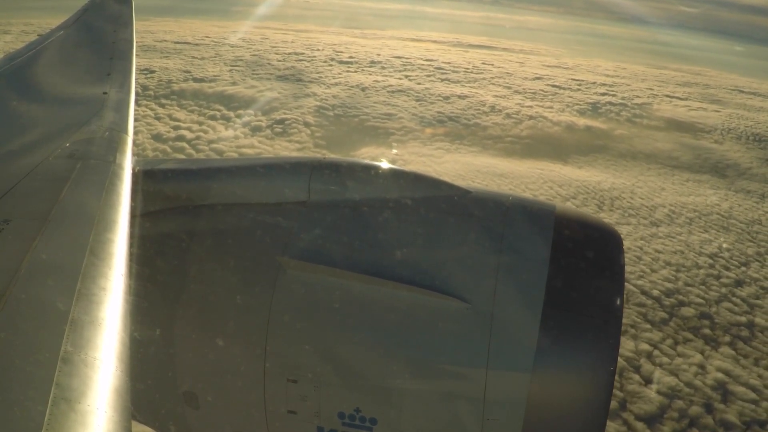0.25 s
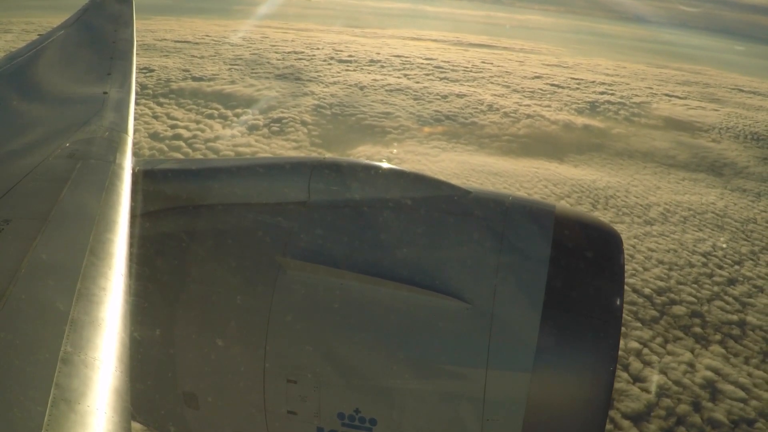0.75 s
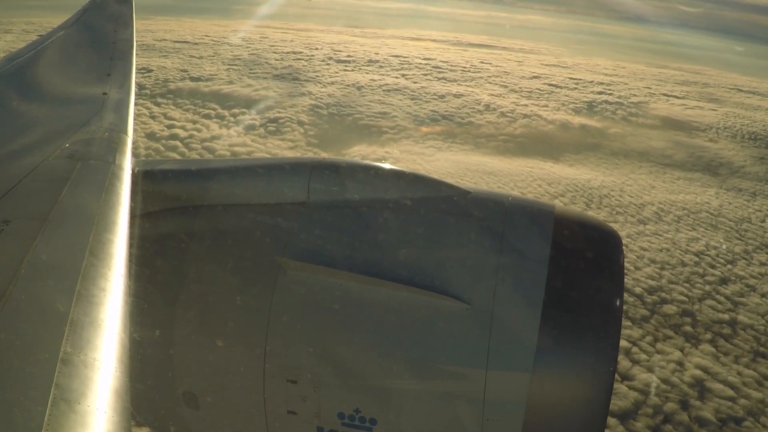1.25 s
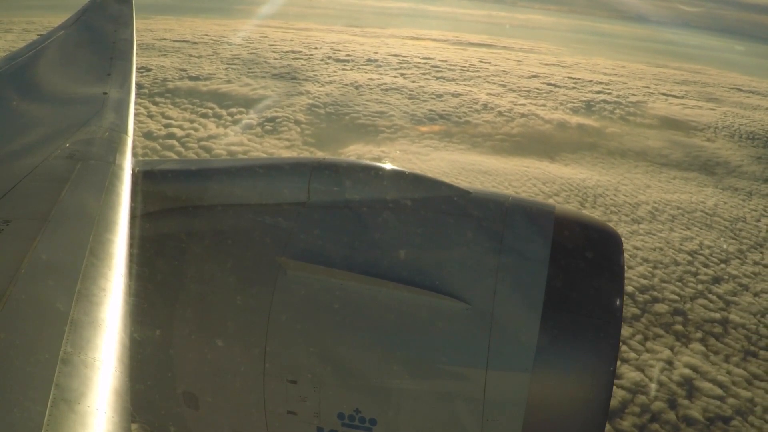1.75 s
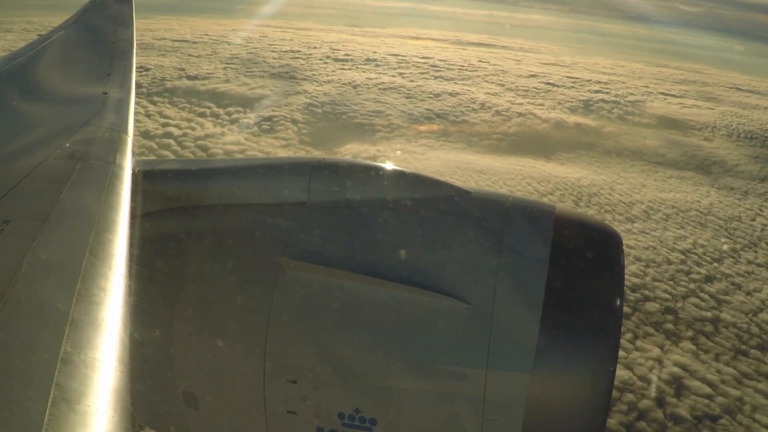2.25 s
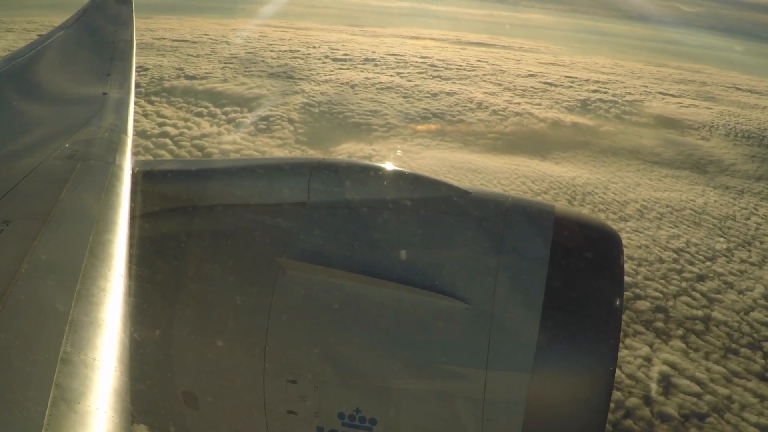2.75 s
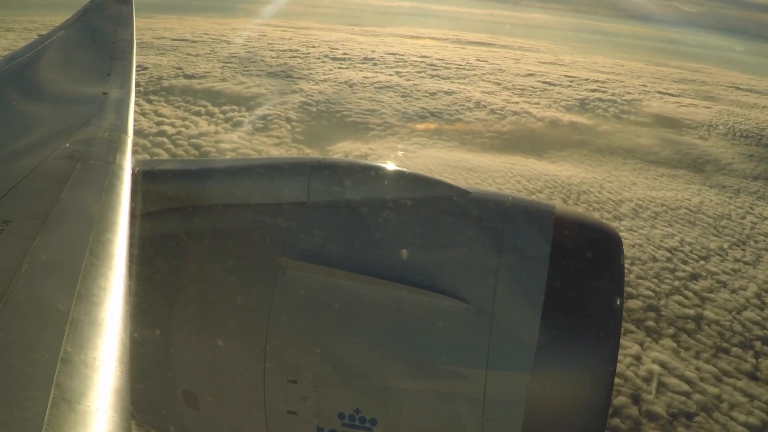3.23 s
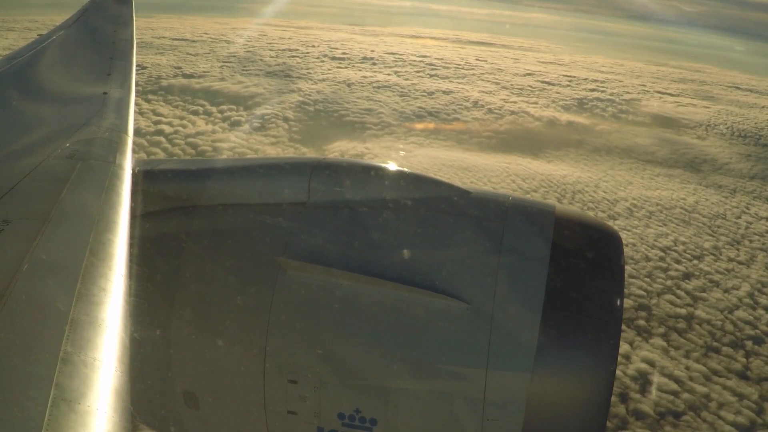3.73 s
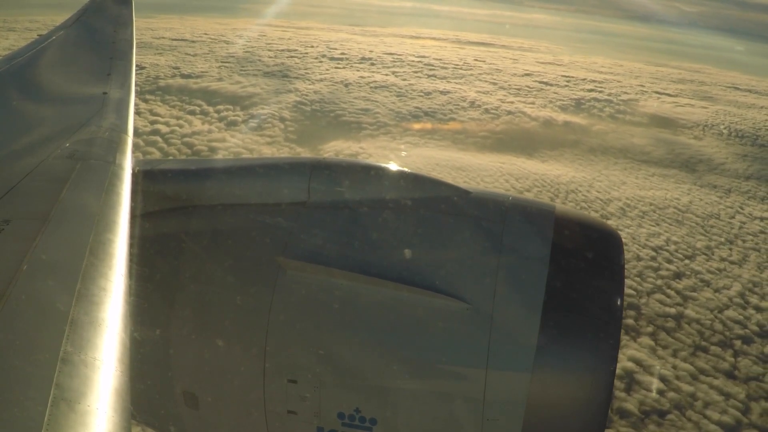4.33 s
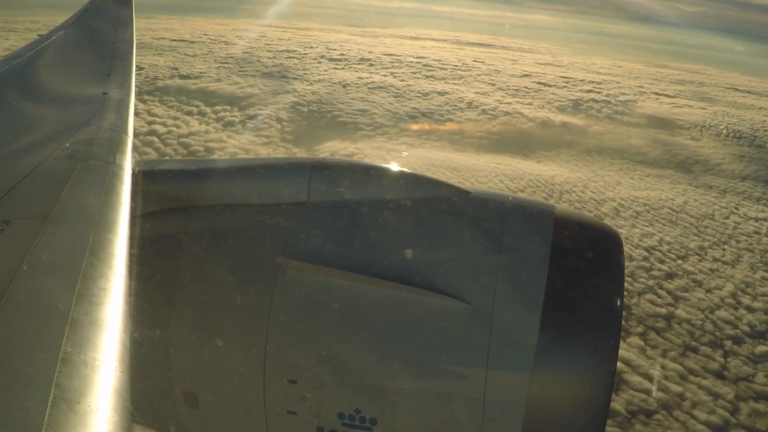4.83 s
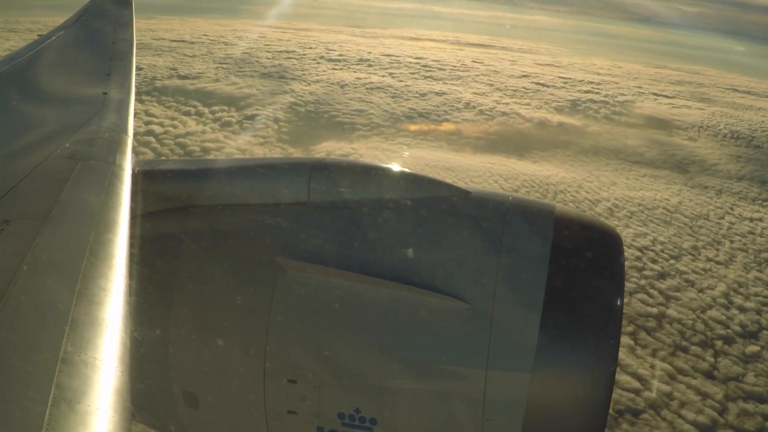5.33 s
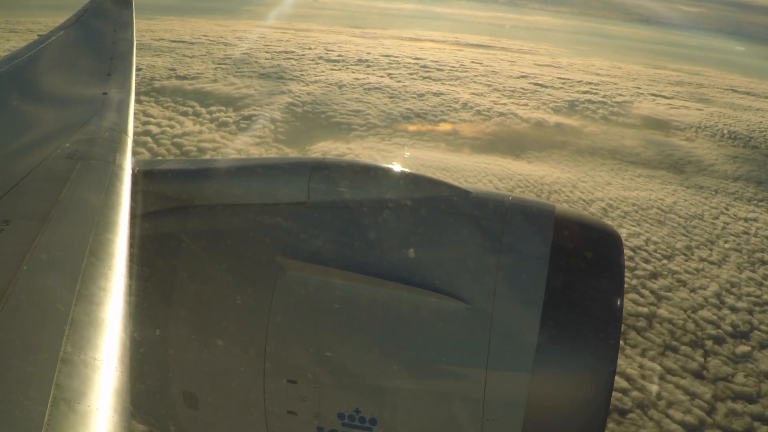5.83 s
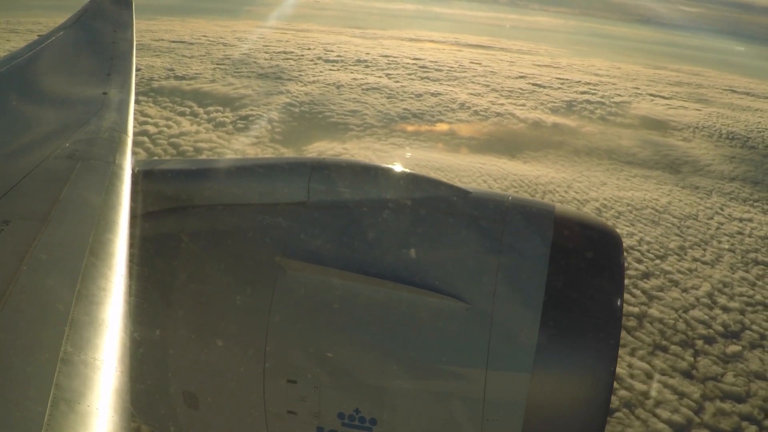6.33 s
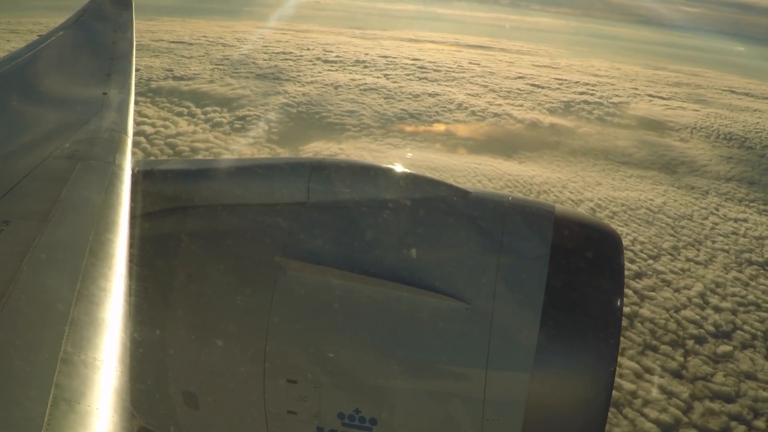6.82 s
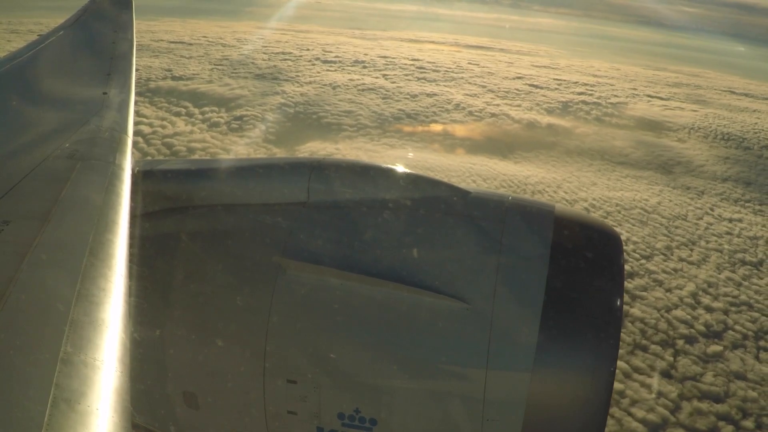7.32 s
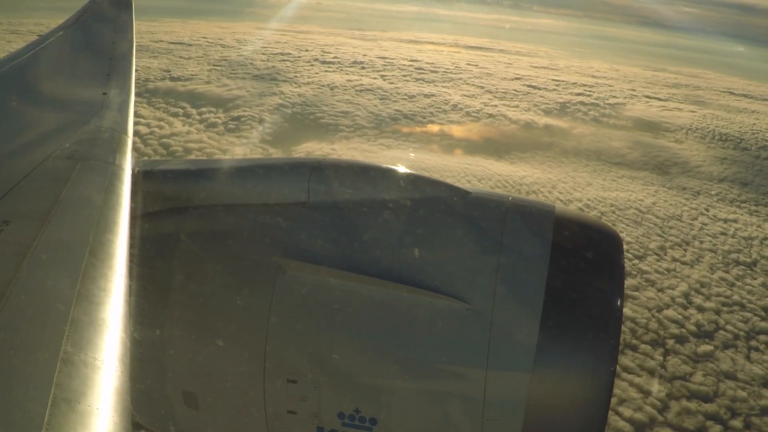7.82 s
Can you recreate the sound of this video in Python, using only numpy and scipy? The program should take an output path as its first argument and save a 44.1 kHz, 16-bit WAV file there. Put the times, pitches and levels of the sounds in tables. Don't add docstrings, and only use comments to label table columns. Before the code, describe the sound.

Inside a cruising jet, deep droning engine and rushing air continue throughout, broken by scattered tray knocks, a bright cutlery clink and small rustling ticks.

```python
import sys
import numpy as np
from scipy import signal
from scipy.fft import rfft, irfft
from scipy.io import wavfile
from scipy.ndimage import uniform_filter1d

SR = 44100
rng = np.random.default_rng(int(sys.argv[2]) if len(sys.argv) > 2 else 0)


def waveform_to_disk(signal):
    frames = np.transpose(np.atleast_2d(signal))
    scaled = np.clip(frames, -1, 1) * 32767
    samples = np.round(scaled).astype(np.int16)
    wavfile.write(sys.argv[1], SR, samples)


def ratio(d):
    e = np.asarray(d, float) / 20
    return 10 ** e


N = 355887

# (frequency [Hz], density [dB per Hz])
WALL_SPECTRUM = [(8, -44.5), (25, -23), (45, -3.5), (70, -5.5), (95, -6), (140, -1), (190, -8), (235, -11),
                 (300, -17.5), (370, -11.5), (430, -19), (600, -26.5), (660, -32), (900, -37)]
# (frequency [Hz], width [Hz], lift above the wall [dB])
CABIN_MODES = [(45.7, 16, 0.5), (58, 8.8, 8), (81.6, 3.8, -5.5), (121.3, 8.4, 4), (215.5, 32, 5.5),
               (256.9, 10.1, 10.5), (313.7, 4.7, 5.5), (336, 6.9, 6.5), (601.7, 15, 6), (628.5, 34, 1.5),
               (756, 12, -1.5)]
# (time [s], level [dB])
LOW_ROAR_DRIFT = [(0, -14), (.5, -11.5), (1.1, -11), (1.8, -12), (2.3, -11), (2.9, -13), (3.4, -11), (4.2, -10.5),
                  (4.7, -12.5), (5.1, -10), (5.7, -12), (6.3, -12.5), (6.6, -11), (7.3, -11), (7.7, -12.5),
                  (8.07, -11)]
ROAR_SPLIT_HZ = [
    95,
    230,
]
# (frequency [Hz], level [dB rms])
SHAFT_TONES = [(346, -25.5), (61.2, -28)]
# (frequency [Hz], density [dB per Hz])
RUSH_SPECTRUM = [(410, -31), (700, 0), (787, -8), (872, -3), (1060, -8), (1160, -10), (2080, -18.5),
                 (2220, -20), (3360, -26.5), (3720, -27), (5280, -29.5), (14100, -54.5), (15500, -69.5)]
# (frequency [Hz], level [dB rms])
WHINES = [(2299, -61), (3601, -65), (4791, -73), (5146, -70), (8064, -83), (8349, -83), (8516, -85),
          (9012, -78), (10002, -82), (10777, -89), (10993, -80), (11353, -85), (14190, -84)]
# (frequency [Hz], density [dB per Hz])
RUSTLE_SPECTRUM = [(1500, -22), (3000, -8.5), (6000, 7), (9000, 1.5), (12000, -11.5), (15000, -27)]
# (centre [s], half width [s], rise [dB])
FIDGETS = [
    (.65, .3, -4),
    (5.9, .2, 7),
    (6.95, .25, 5.5),
]
# (time [s], length [s], pitch [Hz],
# level [dB])
RUBS = [(.13, .04, 9000, -59), (1.65, .26, 7860, -63), (2.99, .05, 10000, -59), (3.605, .054, 9000, -53),
        (4.88, .088, 1700, -41.5), (4.904, .12, 6000, -51), (5.312, .05, 4230, -32.5),
        (5.308, .04, 8500, -38), (5.306, .05, 12930, -59.5), (5.27, 0.033, 8000, -54.5),
        (5.316, .043, 1380, -34), (5.699, 0.014, 8500, -30), (5.908, .12, 5430, -42),
        (5.915, .07, 11000, -53), (5.93, 0.041, 1600, -38), (6.06, .1, 9400, -57),
        (6.282, .16, 8000, -56.5), (6.862, 0.013, 5000, -42), (6.947, .18, 8400, -51),
        (7.068, 0.028, 1480, -27.5), (7.07, .022, 704, -30), (7.154, .06, 8500, -57),
        (7.47, .05, 10050, -62), (7.777, .095, 8500, -55)]
# (time [s], length [s], pitch [Hz],
# level [dB])
KNOCKS = [(2.655, .035, 2650, -41), (3.2, .023, 2350, -34), (6.89, 0.026, 2300, -48),
          (7.073, .025, 1040, -30), (5.7, .012, 1600, -38), (5.916, .014, 2470, -32),
          (3.198, .015, 3750, -40), (2.652, 0.0276, 1700, -41), (3.07, .1, 6300, -54)]
# (time [s], length [s], pitch [Hz], level [dB])
SQUEAKS = [(2.646, .042, 11400, -50), (3.04, .11, 1790, -45), (3.07, .1, 6250, -58),
           (3.215, .035, 11500, -59), (5.812, .028, 8250, -50.5), (6.32, .07, 11700, -68),
           (6.97, .1, 8100, -56), (7.455, .03, 3700, -64)]
# (frequency [Hz], level [dB], t60 [s], part [0 blade, 1 handle, 2 tip])
CUTLERY_MODES = [(2650, -4, .3, 0), (4895, -8, .08, 0), (5180, -9, .1, 0), (5234, -2, .18, 0),
                 (10672, 1, .16, 2), (11810, -3, .13, 2), (11855, -4, .13, 2), (14700, -10, .08, 2),
                 (6700, 0, .14, 1), (6640, -10, .08, 1), (7685, -2, .09, 1)]
# (time [s], blade level [dB], handle level [dB], tip level [dB])
CLINKS = [
    (5.685, -65, -48, -75),
    (5.711, -25.5, -33, -36),
    (5.783, -35.5, -60, -44),
    (5.797, -46, -37, -50),
    (5.842, -60, -51, -60),
    (5.98, -74, -60, -77),
    (6.018, -68, -41, -70),
    (6.153, -71, -43, -58),
    (6.175, -75, -67, -66),
]
# (time [s], peak [dB], body relative to peak [dB], brightness relative to peak [dB])
CLACKS = [(2.6495, -23, -1, -15), (2.656, -29, 6, -18), (3.1977, -21, -0.5, -13.5),
          (3.6265, -30.5, -13, -15), (5.142, -26, -15, -10.5), (5.3143, -27.5, -13, -5),
          (5.3284, -19, -3, -14), (5.699, -12.5, -14, -6.5), (5.777, -24, -8, -3),
          (5.918, -24, -0.5, -23.5), (5.9498, -24, -1, -25), (6.825, -25.5, -3, -23),
          (6.8348, -31, -7, -15), (7.0726, -18.5, -12, -3.5), (7.079, -21, 0, -22),
          (7.6797, -27.5, -15, -9.5), (7.743, -26.5, -13, -10), (7.785, -26.5, -16, -20),
          (7.8885, -39, -8, -6)]
# (time [s], peak [dB])
TICKS = [(2.399, -42), (4.0614, -38), (5.0794, -39), (6.017, -37), (6.1544, -34), (6.541, -35.5),
         (6.796, -31), (6.864, -31), (6.9083, -35), (6.9461, -29.5), (6.997, -29), (7.0284, -32)]
# (low edge [Hz], high edge [Hz])
CLACK_BANDS = [
    (3200, 7950),
    (8200, 11000),
    (11800, 16000),
]


def read(points, hz):
    f, value = np.transpose(points)
    return np.interp(np.log(hz + 1), np.log(f + 1), value)


def curve(rows, order=1):
    rows = np.array(rows)
    return np.interp(np.arange(N) / SR, rows[:, 0], rows[:, order])


def evened(x):
    return x / np.sqrt(np.mean(x ** 2) + 1e-20)


def wandering(count, size):
    return evened(uniform_filter1d(rng.standard_normal(count), size=size))


def add(mix, s, sound):
    part = mix[round(s * SR):][:len(sound)]
    part += sound[:len(part)]


def band(x, lo_hz, hi_hz):
    edges = np.clip([lo_hz, hi_hz], 10, 20000)
    sos = signal.butter(3, edges, "bandpass", fs=SR, output="sos")
    return evened(signal.sosfilt(sos, x))


def noise(shape_db, patchy_db, size):
    frames, hz = 4 * N // size + 6, np.fft.rfftfreq(size, 1 / SR)
    real, imag, patches = rng.standard_normal((frames, len(hz), 3)).T
    patches = uniform_filter1d(patches, size=12, axis=0)
    patches = evened(uniform_filter1d(patches, size=10, axis=1))
    z = (real + 1j * imag) * ratio(shape_db(hz)[:, None] + patchy_db * patches)
    sound = signal.istft(z, nperseg=size, noverlap=3 * size // 4)[1]
    return evened(sound[size:N + size])


def tone(hz, db, waver_hz):
    drift = wandering(N // 1000 + 2, size=12)
    f = hz + waver_hz * np.interp(np.arange(N) / 1000, np.arange(len(drift)), drift)
    turns = np.cumsum(f) / SR + rng.random()
    return np.sqrt(2) * ratio(db) * np.sin(2 * np.pi * turns)


def rush():
    air = ratio(-36) * noise(lambda hz: read(RUSH_SPECTRUM, hz), patchy_db=0.78, size=1024)
    return air + sum(tone(hz, db, waver_hz=1.5) for hz, db in WHINES)


def roar_shape_db(hz):
    lift_db = sum(db / (1 + (2 * (hz - f) / width) ** 2) for f, width, db in CABIN_MODES)
    fall_db = 60 * (hz > 800) * np.log2(hz / 800 + 1e-9)
    return read(WALL_SPECTRUM, hz) + lift_db - fall_db


def roar():
    body = rfft(noise(roar_shape_db, patchy_db=-0.56, size=16384))
    zone = np.searchsorted(ROAR_SPLIT_HZ, np.fft.rfftfreq(N, 1 / SR))
    rumble, drone, panel = (evened(irfft(body * (zone == k), N)) for k in range(3))
    out = ratio(-18) * panel + sum(tone(hz, db, waver_hz=0.85) for hz, db in SHAFT_TONES)
    drift_db = curve(LOW_ROAR_DRIFT) + 11.5
    for part, db, follow in ((rumble, -16.5, 0.5), (drone, -12.5, 2.1)):
        steady = part / np.sqrt(uniform_filter1d(part ** 2, size=15000) + 0.082)
        out += ratio(db + follow * drift_db) * steady
    return out


def rustle():
    grains = ratio(1.5 * rng.exponential(1, N // 100 + 1))
    crinkle = np.repeat(evened(uniform_filter1d(grains, size=2)), 100)[:N]
    t = np.arange(N) / SR
    bouts_db = sum(db * np.exp(-((t - s) / half) ** 2) for s, half, db in FIDGETS)
    paper = noise(lambda hz: read(RUSTLE_SPECTRUM, hz), patchy_db=2.0, size=512)
    return ratio(-63 + bouts_db) * crinkle * paper


def rubs():
    out = np.zeros(N)
    for rows, width in ((RUBS, 0.65), (KNOCKS, 0.12), (SQUEAKS, 0.014)):
        for s, length, hz, db in rows:
            count = int(length * SR)
            scrape = band(rng.standard_normal(20000), hz * (1 - width / 2), hz * (1 + width / 2))
            scrape = evened(scrape[-count:])
            add(out, s, ratio(db) * scrape * np.sqrt(np.hanning(count)))
    return out


def clinks():
    out, t = np.zeros(N), np.arange(14000) / SR
    held = 1 / (1 + (t / 0.054) ** 8)
    onset = 1 - np.exp(-t / 0.00053)
    for s, *blow_db in CLINKS:
        for hz, db, t60, part in CUTLERY_MODES:
            chatter_db = 1.4 * wandering(len(t), size=300)
            level = ratio(blow_db[round(part)] + db + chatter_db - 60 * t / t60) * held
            add(out, s, level * onset * np.sin(2 * np.pi * (hz * t + rng.random())))
    return out


def clacks():
    out, t = np.zeros(N), np.arange(12000) / SR
    body_hz, crack_t60_s, scatter_t60_s = 2380, 0.016, 0.15
    tick_body_db, tick_edge_db = -7, -12.5
    ticks = [(*row, tick_body_db, tick_edge_db) for row in TICKS]
    onset = 1 - np.exp(-t / 0.00068)
    crack = 0.84 * ratio(-60 * t / crack_t60_s)
    for s, peak_db, body_db, edge_db in CLACKS + ticks:
        ragged = ratio(1.7 * wandering(len(t), size=90))
        shape = onset * (crack + 0.46 * ragged * ratio(-60 * t / scatter_t60_s))
        middle, edge, air = (band(rng.standard_normal(len(t)), *edges) for edges in CLACK_BANDS)
        body = band(rng.standard_normal(len(t)), 0.82 * body_hz, 1.3 * body_hz)
        bright = ratio(edge_db - 82 * t) * (edge + ratio(-10.0) * air)
        lumps = ratio(2 * wandering(6001, size=130) - 0.5)
        struck = irfft(lumps * rfft(middle + ratio(body_db) * body + bright))
        add(out, s, ratio(peak_db - 6.0) * shape * struck)
    return out


def scene():
    return (rush() + roar() + rustle() + rubs() + clinks() + clacks())[None]


def low_pass(x):
    return signal.sosfilt(signal.butter(12, 15640, fs=SR, output="sos"), x)


def record(dry):
    excess = dry - np.clip(dry, -0.985, 0.985)
    soft_excess = signal.oaconvolve(excess, signal.firwin(63, 2500, fs=SR)[None], "same")
    rounded = dry - soft_excess
    dull = signal.oaconvolve(rounded, signal.firwin(41, 15400, fs=SR)[None], "same")
    return low_pass(dull)


dry = scene()
out = record(dry)
waveform_to_disk(out)
```